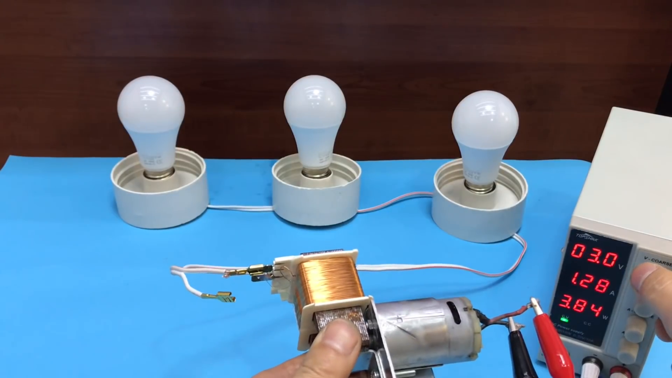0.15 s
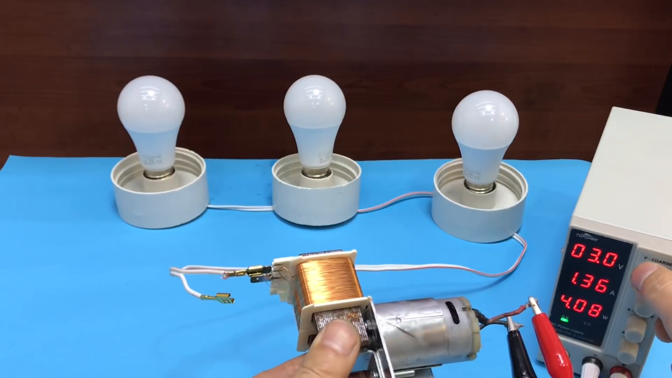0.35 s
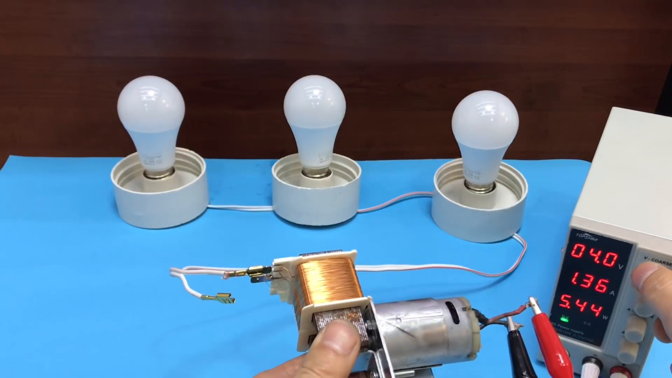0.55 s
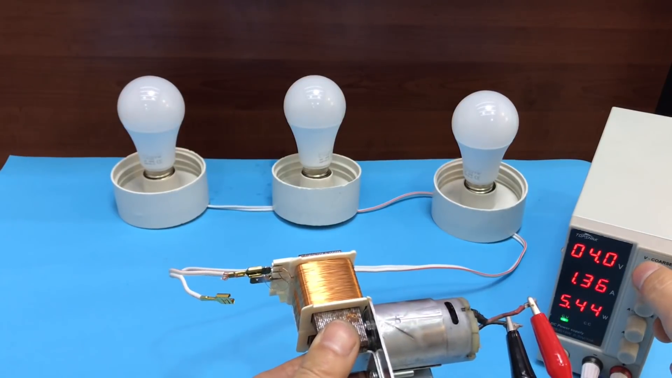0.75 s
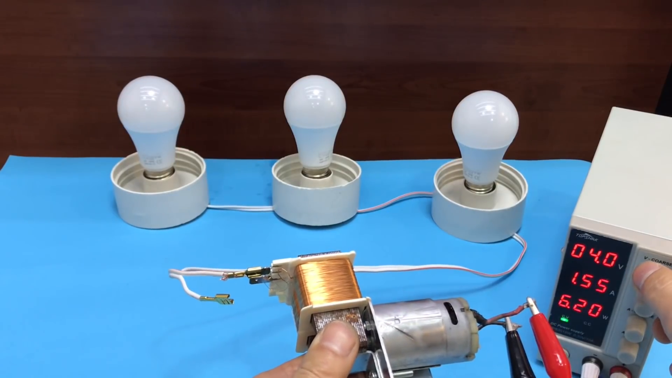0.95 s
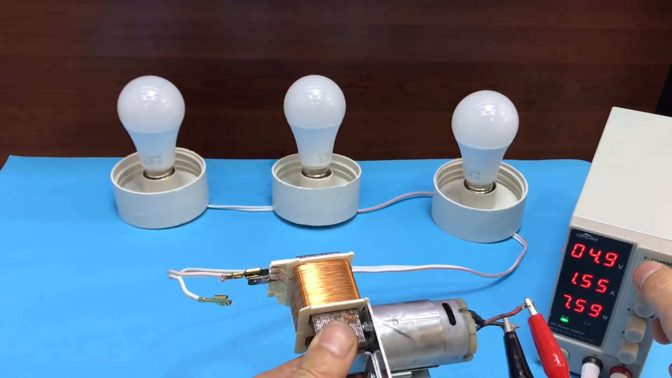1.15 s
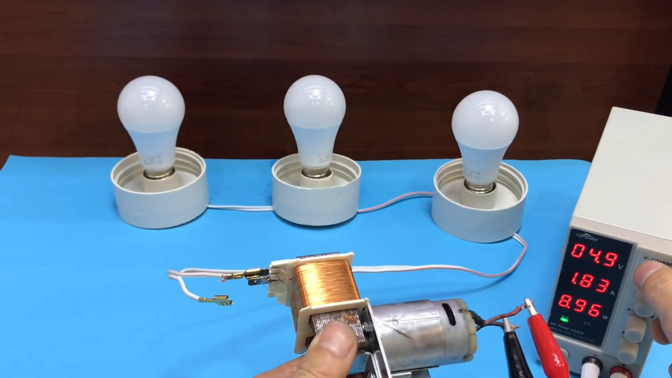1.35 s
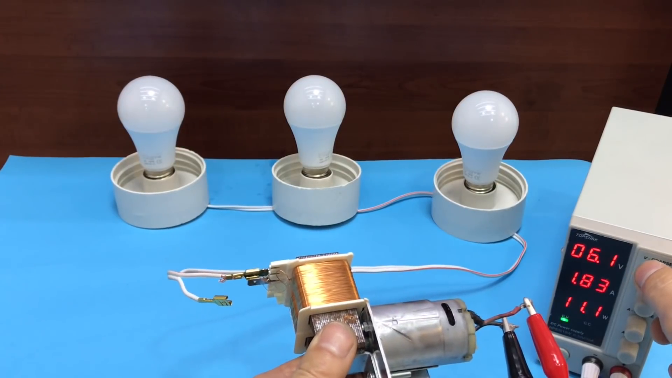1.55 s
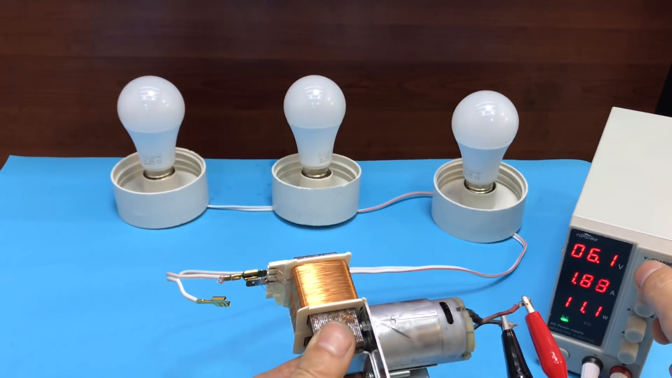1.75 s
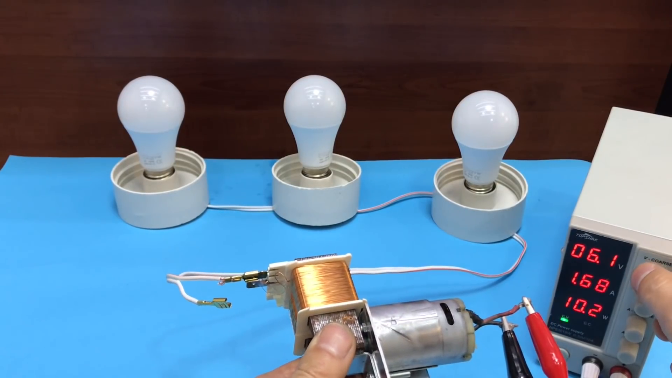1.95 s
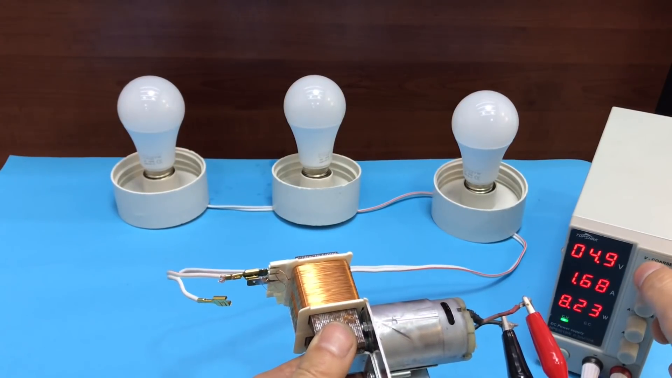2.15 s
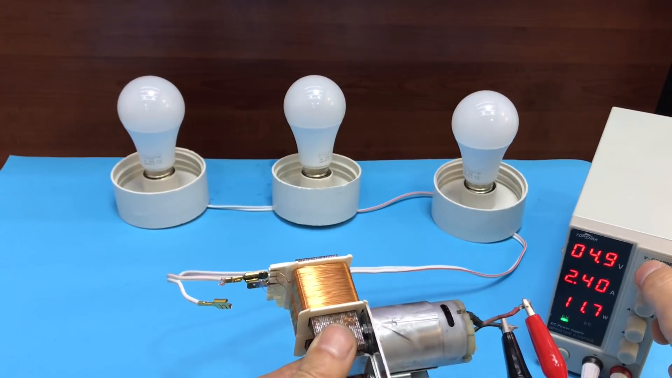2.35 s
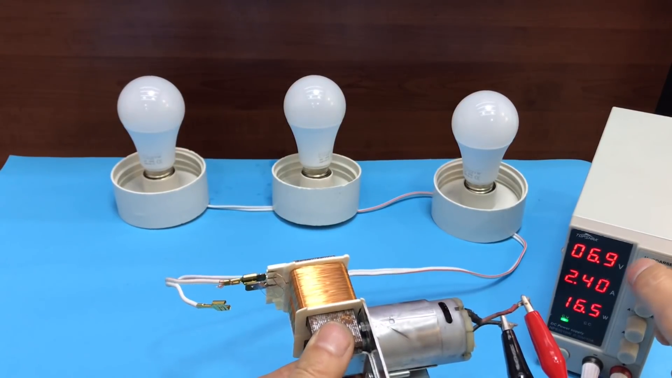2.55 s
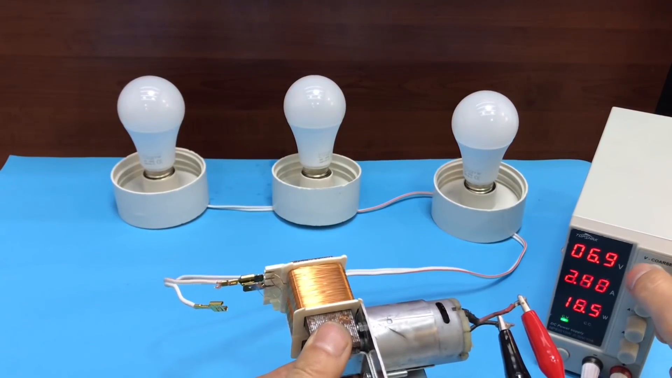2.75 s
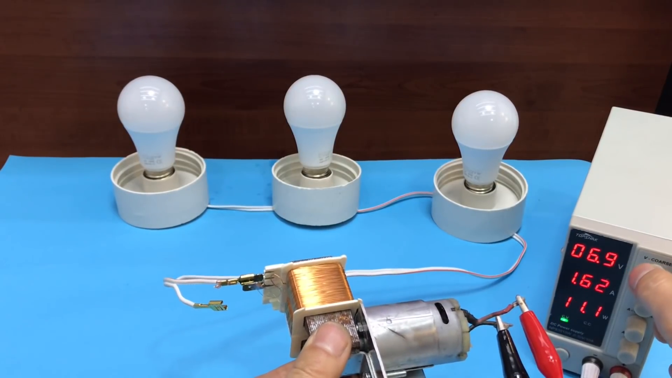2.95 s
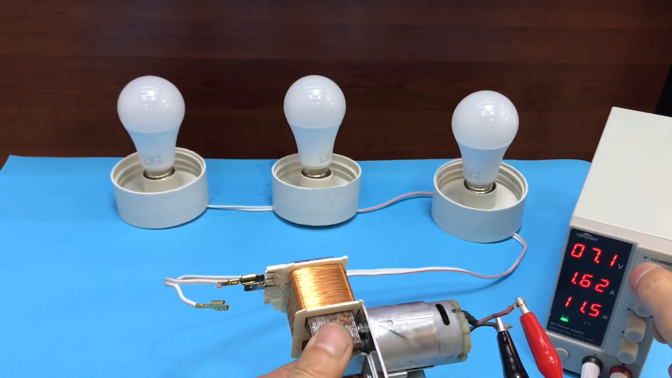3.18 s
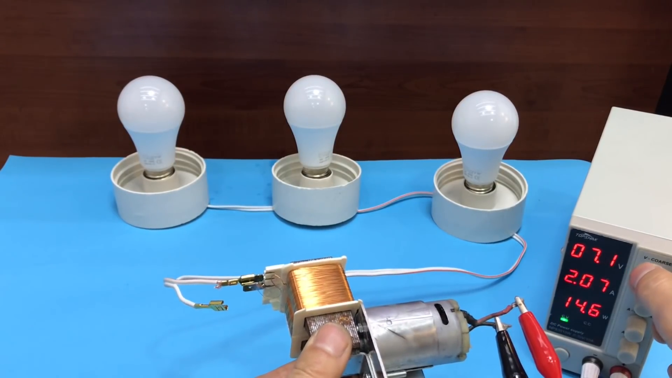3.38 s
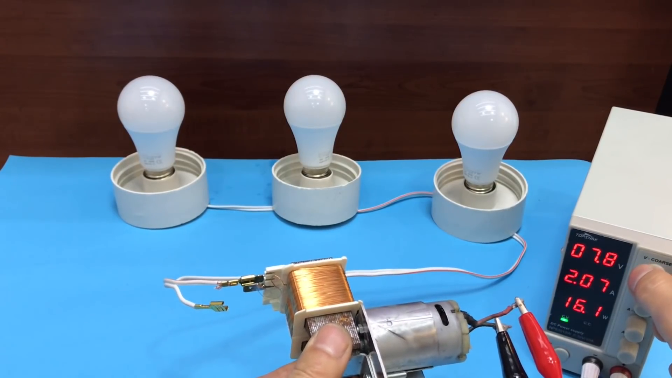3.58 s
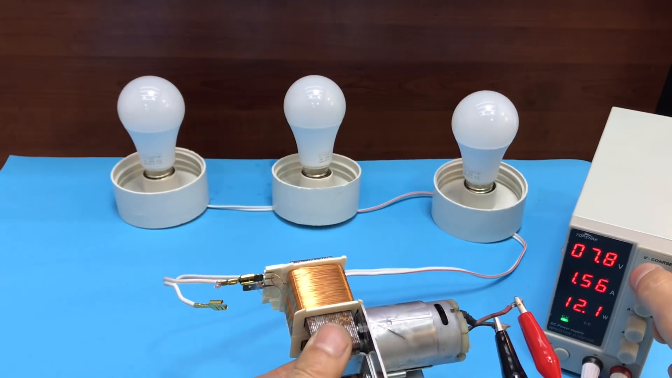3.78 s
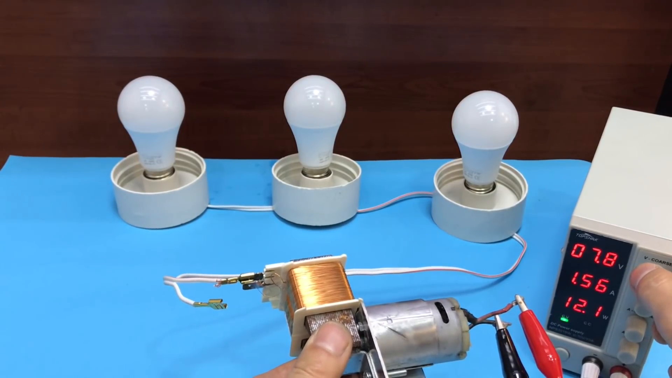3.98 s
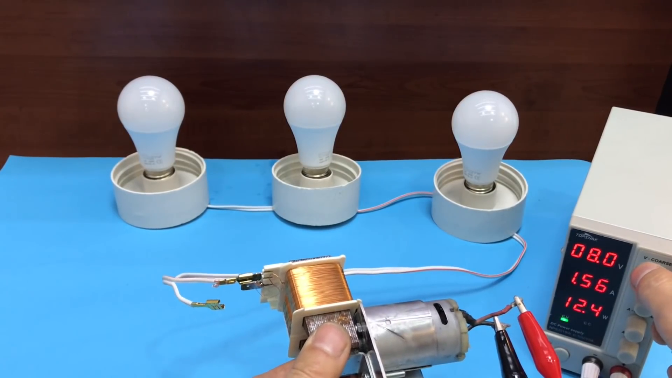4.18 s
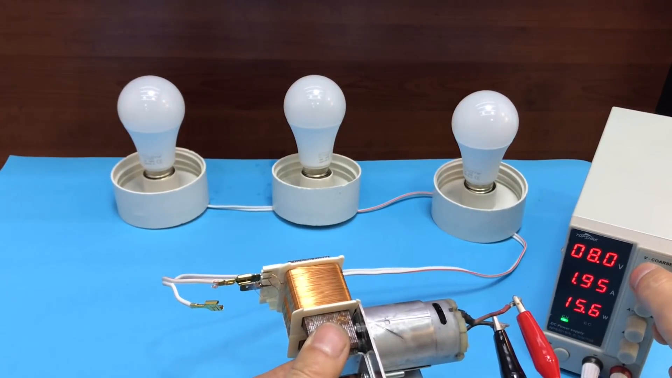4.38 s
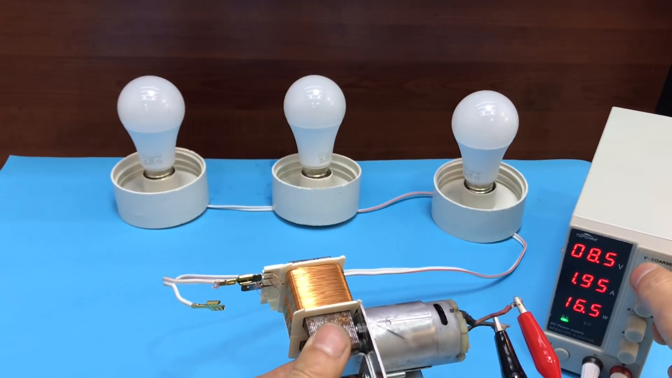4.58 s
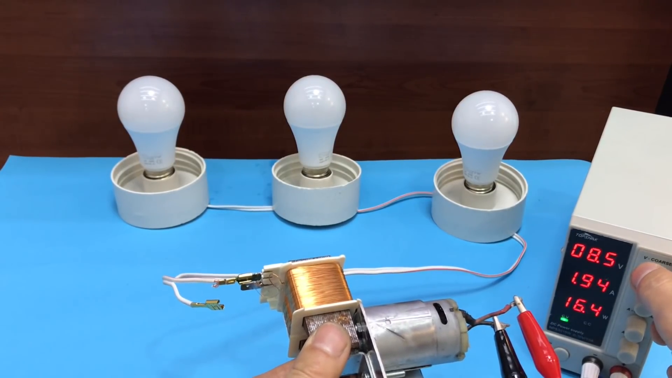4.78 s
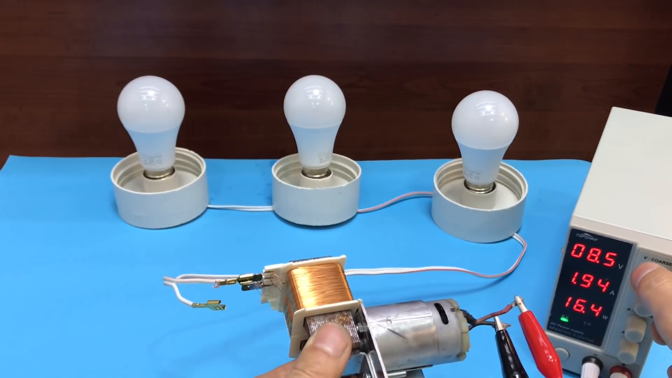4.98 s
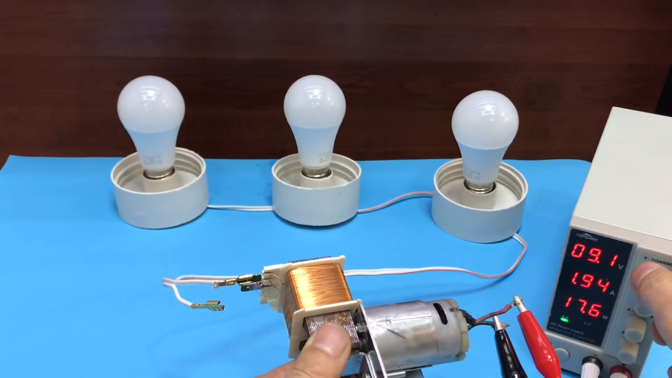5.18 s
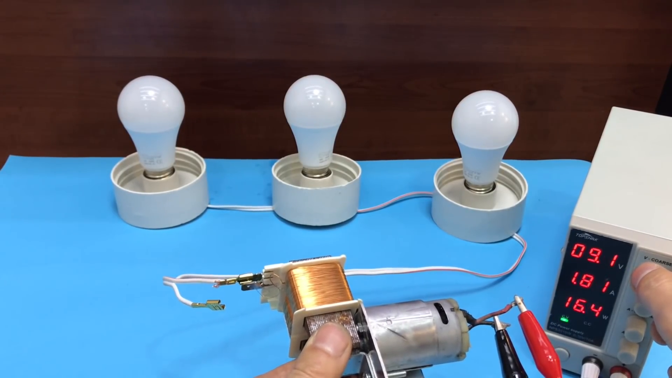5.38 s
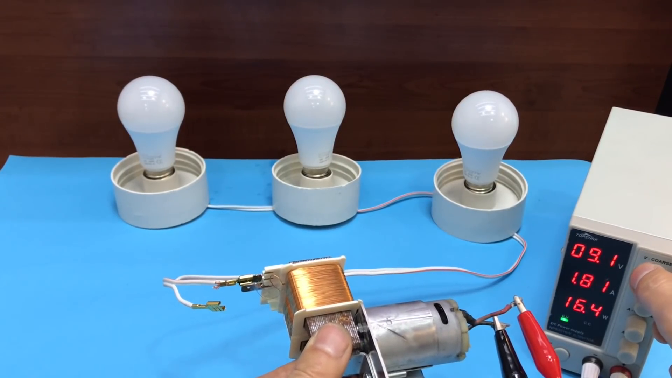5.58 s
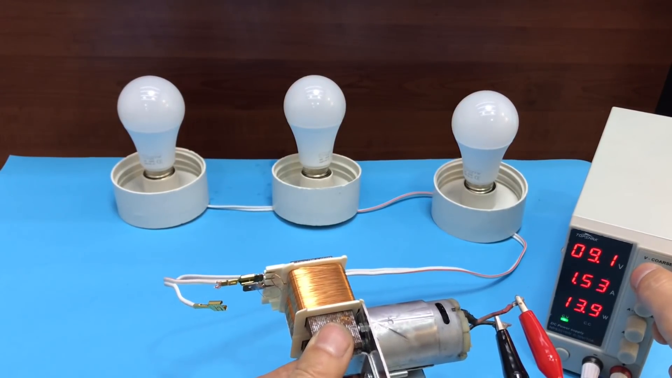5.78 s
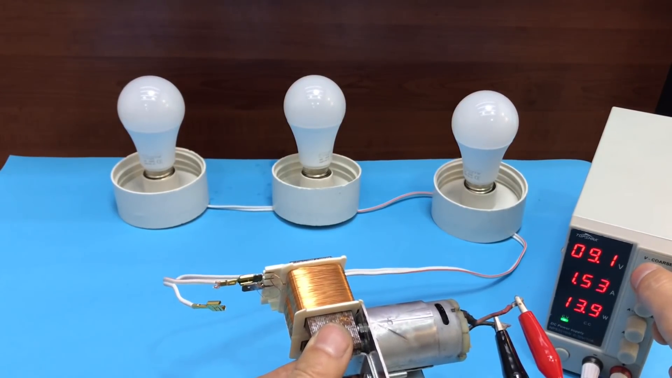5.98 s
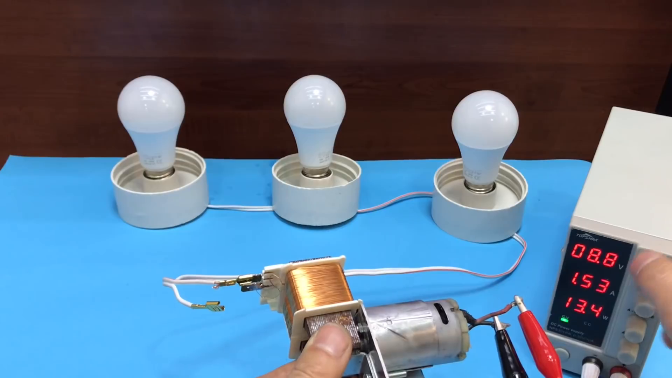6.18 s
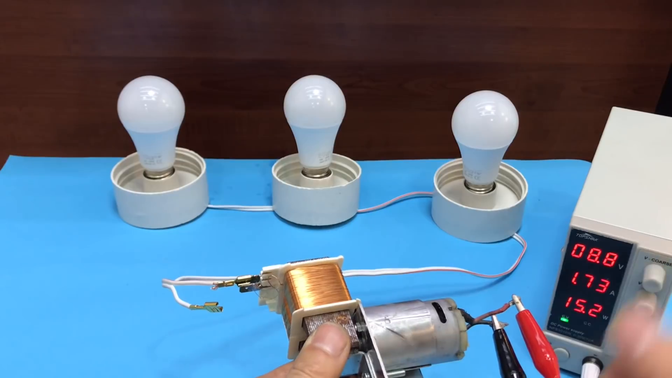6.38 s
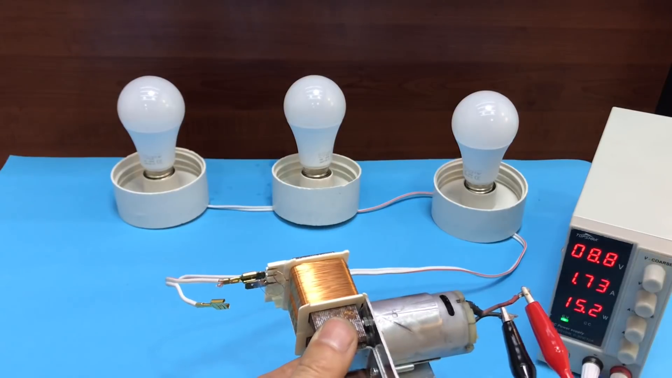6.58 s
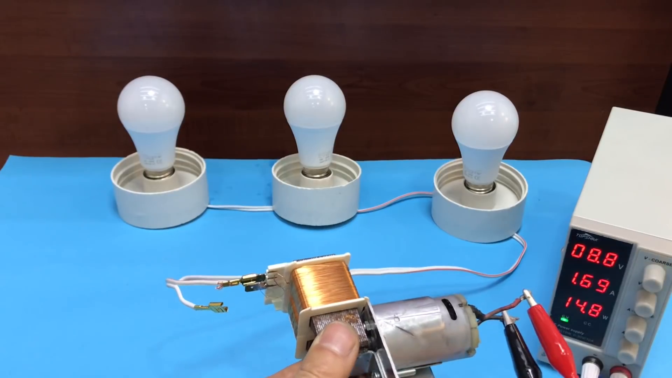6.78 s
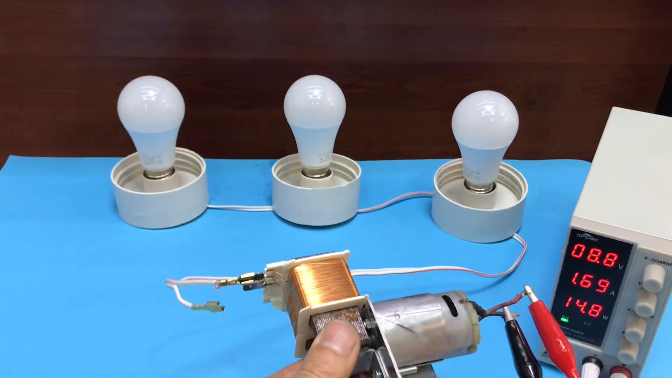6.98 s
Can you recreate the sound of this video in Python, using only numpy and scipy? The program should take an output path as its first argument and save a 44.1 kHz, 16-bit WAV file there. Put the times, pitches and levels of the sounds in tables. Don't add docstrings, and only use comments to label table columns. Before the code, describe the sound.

A small brushed electric motor spins up with a gritty rising whine, rattles and knocks, sags, then settles into a steady high whir.

```python
import sys
import numpy as np
from scipy import signal
from scipy.fft import rfft, irfft
from scipy.io import wavfile
from scipy.ndimage import uniform_filter1d

SR = 44100
rng = np.random.default_rng(int(sys.argv[2]) if len(sys.argv) > 2 else 0)


def gain_from_db(level_db):
    decades = np.asarray(level_db, float) / 20
    return 10 ** decades


def store_wav(level_fs):
    pcm = np.round(np.clip(np.atleast_2d(level_fs), -1, 1) * 32767)
    wavfile.write(sys.argv[1], SR, pcm.T.astype(np.int16))


N = 310023
FULL_HZ = 188

# pitch_hz [Hz], width_hz [Hz], level_db [dB]
CAN_MODES = [(558, 61, -8.5), (912.6, 42, -14), (1187, 190, -8.5), (1580.5, 71, -5), (2111, 134, -1),
             (2607, 99, -2.5), (3370, 190, -12), (3905, 190, 1), (5300, 90, -18), (6230, 590, -5.5),
             (7260, 77, -7), (1904, 52, -4)]
# pitch_hz [Hz], width_hz [Hz], level_db [dB]
SPRING_MODES = [(12200, 200, -12), (12700, 200, -11), (13100, 200, -8), (13700, 200, -4), (15000, 400, -1),
                (15400, 500, -1)]
# pitch_hz [Hz], level_db [dB]
SPRING_SMOOTH = [(8000, -30), (12000, -16), (14300, -17), (16000, -14)]


def evened(x):
    return x / np.sqrt(np.mean(x ** 2) + 1e-20)


def read(points, hz):
    f, value = np.transpose(points)
    return np.interp(np.log(hz + 1), np.log(f + 1), value)


def columns(table):
    s, *cols = np.transpose(table)
    return [np.interp(np.arange(N) / SR, s, c) for c in cols]


def held(x, s):
    return uniform_filter1d(x, round(s * SR), mode="nearest")


def spells(rows, ramp_s=.015):
    t = np.arange(N) / SR
    steps = sum(db * ((t >= start) & (t < end)) for start, end, db in rows)
    return held(steps, ramp_s)


def wander(hz):
    knots = rng.standard_normal(4000)
    return np.interp(np.arange(N) * 2 * hz / SR, np.arange(4000), knots) * 1.044


def ring(x, modes, wash, size=8192):
    hz = abs(np.fft.fftfreq(size, 1 / SR))
    power = gain_from_db(2 * read(wash, hz))
    for mode_hz, width_hz, db in modes:
        power = power + gain_from_db(2 * db) / (1 + (2 * (hz - mode_hz) / width_hz) ** 2) ** 2
    log_gain = np.log(power) / 2
    response = np.exp(np.conj(signal.hilbert(log_gain)))
    taps = np.fft.ifft(response).real[:size // 2]
    return signal.oaconvolve(x, taps / np.linalg.norm(taps))[:len(x)]


def resonate(x, hz, width):
    turn = np.exp(2j * np.pi * np.cumsum(hz * np.ones(len(x))) / SR)
    r = np.exp(-np.pi * width / SR)
    return evened((turn * signal.lfilter([1], [1, -2 * r, r * r], x / turn)).real)


def shaft():
    # time_s [s], speed_hz [Hz]
    knob = [(0, 66.9), (.34, 81), (.72, 103.8), (1.08, 122), (1.33, 142), (1.43, 144), (1.74, 159.3),
            (1.86, 163), (2.5, 171.3), (2.96, 173.8), (3.19, 182.9), (3.39, 199.5), (4.27, 218),
            (4.62, 217.5), (4.91, 230.3), (5.48, 233.8), (5.99, 224), (7.03, 225.5)]
    # start_s [s], lowest_s [s], end_s [s], depth_hz [Hz]
    sags = [
        (1.84, 2.11, 2.49, 45),
        (3.42, 3.73, 4.27, 23.5),
        (5.48, 5.73, 5.99, 11.5),
    ]
    t = np.arange(N) / SR
    speed = columns(knob)[0]
    for start, low, end, depth_hz in sags:
        dip = np.interp(t, [start, low, end], [0, 1, 0])
        speed = speed - depth_hz * np.sin(np.pi / 2 * dip) ** 2
    return held(speed, .06)


def octaves_slow(speed):
    return np.log2(np.minimum(speed / FULL_HZ, 1))


def contact_db():
    # start_s [s], end_s [s], level_db [dB]
    contact = [(.15, .185, 1), (.195, .22, -0.5), (.37, .42, 0), (.43, .5, -1.5), (.93, 1.0, -0.5),
               (1.58, 1.99, 0), (2.01, 2.27, -0.23), (2.05, 2.21, -.5), (3.13, 3.17, 0.5),
               (3.18, 3.3, -0.5), (3.375, 3.4, 0), (3.54, 3.57, -0.5), (3.64, 3.83, 0), (3.85, 3.95, 0.5),
               (7.02, 7.1, -1)]
    return spells(contact)


def level_db(speed, full_db, per_oct_db, contact_share, own=((0, 1, 0),)):
    return full_db + per_oct_db * octaves_slow(speed) + contact_share * contact_db() + spells(own)


def room():
    # pitch_hz [Hz], level_db [dB per Hz]
    still = [(15, -36), (27, -6), (54, -4), (86, 1), (156, -3), (179, -13), (219, -8), (261, -22),
             (500, -5.5), (650, -26), (1100, -120)]
    # pitch_hz [Hz], level_db [dB per Hz]
    moving = [(18, -48), (30, -29), (76, -3), (113, -17), (156, -13), (189, -27), (300, -23.5), (390, -51),
              (660, -120)]
    # time_s [s], level_db [dB]
    moving_db = [(0, -72), (.4, -64), (.55, -72), (1.9, -77), (2.1, -71), (2.3, -75), (2.6, -93),
                 (7.03, -113)]
    # start_s [s], end_s [s], level_db [dB]
    swells = [
        (0, 0.3, 9),
        (.3, 3.0, 4.5),
        (.85, 1.2, 6),
        (4.42, 5.36, 12),
        (5.9, 6.64, 11),
    ]
    t, hz = np.arange(N) / SR, np.fft.rfftfreq(N, 1 / SR)

    def shaped(curve):
        return evened(irfft(rfft(rng.standard_normal(N)) * gain_from_db(read(curve, hz)), N))

    rumble = gain_from_db(-76.5) * shaped(still)
    passing = gain_from_db(columns(moving_db)[0]) * shaped(moving)
    drone_hz = 53.5 + 2.47 * wander(4.7)
    drone_db = -78 + spells(swells, .12) + 3.4 * wander(5.6)
    drone = gain_from_db(drone_db) * np.sin(2 * np.pi * np.cumsum(drone_hz) / SR)
    fan = gain_from_db(-80.5) * np.sin(2 * np.pi * 144.3 * t)
    return rumble + passing + drone + fan


def partial(turns, k, wander_db):
    return gain_from_db(wander_db * wander(3)) * np.cos(2 * np.pi * (k * turns + rng.random()))


def whine(turns, speed):
    # pitch_hz [Hz], level_db [dB]
    first = [(68, -65), (86, -81), (170, -77.5), (184, -84), (198, -75), (209, -69), (219, -76.5),
             (232, -87)]
    # pitch_hz [Hz], level_db [dB]
    third = [(204, -88), (370, -80), (430, -65), (480, -64), (515, -59.5), (550, -49.5), (595, -65.5),
             (650, -72)]
    # pitch_hz [Hz], level_db [dB]
    bars = [(820, -71), (1100, -74), (1450, -73), (1590, -60), (1750, -84), (1920, -58), (2070, -48),
            (2195, -45), (2380, -52), (2650, -50.5), (2700, -51), (2800, -51.5)]
    once = gain_from_db(read(first, speed)) * np.cos(2 * np.pi * turns)
    pull = gain_from_db(read(third, 3 * speed)) * np.cos(6 * np.pi * turns)
    bars_db = read(bars, 12 * speed) + 1.2 * wander(hz=10)
    return np.sqrt(2) * (once + pull + gain_from_db(bars_db) * np.cos(24 * np.pi * turns))


def low_whine(turns, speed):
    # times_shaft_speed [count], level_db [dB]
    multiples = [(4, 7.5), (7, 2.5), (8, 7), (9, 8), (10, 3.5), (11, 3)]
    # pitch_hz [Hz], level_db [dB]
    bench = [(240, 26.5), (400, 20), (555, 12), (750, 10), (1150, 9), (1600, 12), (2500, 6), (5000, 7)]
    # pitch_hz [Hz], level_db [dB]
    can_smooth = [(300, -46), (700, -21.5), (1400, -18), (2200, -7), (2900, -13), (4500, -4), (5600, -9),
                  (7500, -15), (10000, -11.5), (16000, -15.5)]
    # start_s [s], end_s [s], level_db [dB]
    whine_spells = [
        (0, .5, 3),
        (.5, .85, 4),
        (1.0, 1.3, -3),
        (2.0, 2.25, -1.5),
        (2.5, 2.95, -3),
    ]
    db = level_db(speed, full_db=-43, per_oct_db=6.4, contact_share=1) - 22.5
    db = db + spells(whine_spells, 0.057) + 1 * octaves_slow(speed)
    tones = sum(gain_from_db(tone_db) * partial(turns, k, 2.5) for k, tone_db in multiples)
    return ring(ring(gain_from_db(db) * tones, [], bench), CAN_MODES, can_smooth)


def mounted_orders(turns, speed):
    # pitch_hz [Hz], level_db [dB]
    second = [(140, -91), (300, -85.5), (345, -84), (366, -73.5), (390, -80.5), (430, -80), (470, -85)]
    # pitch_hz [Hz], level_db [dB]
    fifth = [(350, -93), (450, -75), (540, -63), (590, -64), (630, -83), (860, -74), (1000, -70.5),
             (1120, -63.5), (1200, -68)]
    # pitch_hz [Hz], level_db [dB]
    sixth = [(400, -75), (540, -67.5), (620, -75), (690, -71), (760, -69.5), (850, -87), (1100, -61.5),
             (1250, -68), (1400, -63.5)]
    answers = (2, second), (5, fifth), (6, sixth)
    return np.sqrt(2) * sum(gain_from_db(read(answer, k * speed)) * partial(turns, k, 1.5) for k, answer in answers)


def seating():
    seats = [(0, .8, .45, .8, .5), (.2, .9, .15, .3, .25), (.52, .4, .55, .85, .92),
             (.82, .4, .55, .85, .85), (.94, .4, .2, .4, .72), (1.27, .4, .1, .2, .3),
             (2.0, .3, .1, .2, .45), (2.25, .4, .1, .2, .3), (2.45, .45, .35, .4, .62),
             (3.2, .3, .4, .17, .4), (3.8, .27, .6, .18, .24), (6.6, .2, .45, .2, .2)]
    s, *shares = np.transpose(seats)
    seat = np.searchsorted(s, np.arange(N) / SR, "right") - 1
    return [held(v[seat], .05) for v in shares]


def ticks(turns, rate, share, odd_db, spread_db, width_s):
    whole = turns.astype(int)
    size_db = spread_db * rng.standard_normal(4000)[whole]
    size_db = size_db - odd_db * (whole % 2)
    age = (turns % 1) / rate / width_s
    burst = (gain_from_db(size_db) * age * np.exp(-age)) ** 2
    return 1 - share + share * burst / uniform_filter1d(burst, 4000)


def scrape(turns, speed):
    rattle, vent, brush, steady = seating()
    odd_db = np.interp(speed, [85, FULL_HZ], [0, 6.5])
    flutter = gain_from_db(0.54 * wander(30) + 0.84 * wander(140))
    worn = sum(np.sqrt(1.5 - 1.5 * (k / 44) ** 2) * partial(turns, k, 1.8) for k in range(13, 44))
    worn *= np.sqrt(3.8 * steady * speed / SR)
    twice = ticks(2 * turns + .15, 2 * speed, rattle, odd_db, 1.5, .0006)
    once = ticks(turns + .6, speed, brush, 1.5, 1.8, .0005)
    vent_tick = ticks(turns + 0.329, speed, vent, 0, 0.91, 0.00014)
    out = frame_scrape(speed, twice, worn, flutter)
    out += can_scrape(speed, twice, worn, steady, flutter)
    out += loose_part_rattle(speed, twice, worn, steady, flutter)
    out += shell_hiss(speed, twice, flutter)
    out += vent_hiss(speed, vent_tick, flutter)
    out += brush_hiss(speed, once, flutter)
    out += cap_hiss(speed, once, flutter)
    out += shield_rattle(turns, speed, twice, steady, flutter)
    out += spring_song(once, flutter)
    return out + grip_hiss(flutter)


def rubbed(db, modes, wash, power, tone, flutter):
    push = np.sqrt(power) * rng.standard_normal(N) + tone
    return ring(push * flutter * gain_from_db(db + 0.069 * wander(26)), modes, wash)


def can_scrape_db(speed):
    # start_s [s], end_s [s], level_db [dB]
    can_spells = [
        (0.198, 0.217, 0),
        (0.23, .372, -0.5),
        (0.374, 0.382, -5),
        (2.036, 2.23, 0),
        (2.792, 3.147, 1.5),
    ]
    return level_db(speed, -43, 6.4, 1, can_spells)


def frame_scrape(speed, twice, worn, flutter):
    # pitch_hz [Hz], level_db [dB]
    frame_smooth = [(300, -58), (700, -19.5), (1400, -20.5), (1800, -29), (3000, -59)]
    # start_s [s], end_s [s], level_db [dB]
    frame_spells = [
        (.1, .5, 1.5),
        (0.54, 1.21, -8),
        (2.026, 2.23, -5),
        (2.5, 3.003, -4),
        (3.0, 3.904, -1),
        (4.097, 7.1, -1),
    ]
    db = can_scrape_db(speed) - 15.5 + spells(frame_spells, .04)
    return rubbed(db, CAN_MODES[:3], frame_smooth, .5 + .5 * twice, worn, flutter)


def can_scrape(speed, twice, worn, steady, flutter):
    # pitch_hz [Hz], level_db [dB]
    upper_smooth = [(700, -57), (1300, -22), (1700, -15.5), (2900, -11), (4500, -6), (5600, -10.5),
                    (7500, -12.5), (16000, -14.5)]
    power = (.5 + .5 * twice) * (1 - .92 * steady)
    return rubbed(can_scrape_db(speed) + 1.5, CAN_MODES[3:], upper_smooth, power, worn, flutter)


def loose_part_rattle(speed, twice, worn, steady, flutter):
    # pitch_hz [Hz], width_hz [Hz], level_db [dB]
    rattle_modes = [(1900, 250, -3), (2200, 400, -2), (2600, 400, -1), (5080, 350, -.5)]
    # pitch_hz [Hz], level_db [dB]
    rattle_smooth = [(900, -50), (1500, -102), (3000, -4), (7000, -20), (12000, -63)]
    # start_s [s], end_s [s], level_db [dB]
    rattle_spells = [(0, .105, 3), (.11, .195, 5), (.225, .372, 1), (.385, .547, 4), (.544, 1.0, -4.5),
                     (1.59, 2.0, -2), (2.01, 2.25, -2), (2.38, 3.192, 1.5), (6.55, 7.1, -1)]
    db = level_db(speed, -48, 20.6, 1, rattle_spells) + 2.5
    return rubbed(db, rattle_modes, rattle_smooth, twice * (1 - 0.54 * steady), worn, flutter)


def shell_hiss(speed, twice, flutter):
    # pitch_hz [Hz], width_hz [Hz], level_db [dB]
    shell_modes = [(8460, 340, -2.5), (9400, 70, 3.5), (10350, 130, -15)]
    # pitch_hz [Hz], level_db [dB]
    shell_smooth = [(6000, -34.5), (8000, -11), (10000, -3.5), (10500, -30), (13000, -11), (15000, -36)]
    # start_s [s], end_s [s], level_db [dB]
    shell_spells = [
        (0, 1.2, 7),
        (2.45, 3.96, 4.5),
        (6.0, 7.1, -2),
    ]
    db = level_db(speed, -40.5, 17.5, 6.2, shell_spells) - 8.0
    return rubbed(db, shell_modes, shell_smooth, 0.43 + 0.24 * twice, 0, flutter)


def vent_hiss(speed, vent_tick, flutter):
    # pitch_hz [Hz], width_hz [Hz], level_db [dB]
    vent_modes = [(11045, 120, -2.5), (11400, 330, -3), (11620, 200, -5), (12130, 300, -5)]
    # pitch_hz [Hz], level_db [dB]
    vent_smooth = [(8000, -53), (10500, -13), (11000, -4.5), (12700, -8.5), (15000, -9)]
    # start_s [s], end_s [s], level_db [dB]
    vent_spells = [(0, .5, 1.6), (.5, 1.9, -1.5), (2.3, 3.3, 0.1), (3.3, 2.5, 0.5), (4.1, 6.5, 1.35),
                   (6.5, 7.1, 0.25)]
    db = level_db(speed, -40.5, 17.5, 6.2, vent_spells) - 1.5
    return rubbed(db, vent_modes, vent_smooth, vent_tick, 0, flutter)


def brush_hiss(speed, once, flutter):
    # pitch_hz [Hz], width_hz [Hz], level_db [dB]
    brush_modes = [(13100, 140, -7), (13700, 160, -4), (14620, 140, -4.5), (15350, 330, 0),
                   (15650, 200, -4)]
    # pitch_hz [Hz], level_db [dB]
    brush_smooth = [(6000, -29.5), (11500, -26), (13000, -17), (15500, -9), (17000, -9)]
    # start_s [s], end_s [s], level_db [dB]
    brush_spells = [(0, 0.16, -2), (0.147, .94, -19), (.94, 1.17, -6), (1.17, 1.58, -0.5),
                    (2.01, 2.195, -10), (2.27, 2.38, 1), (3.2, 4.6, -2), (6.552, 7.1, -11)]
    return rubbed(level_db(speed, -45, 4.3, 2, brush_spells), brush_modes, brush_smooth, once, 0, flutter)


def cap_hiss(speed, once, flutter):
    # pitch_hz [Hz], width_hz [Hz], level_db [dB]
    cap_modes = [(6520, 640, -9.5), (7020, 200, -10), (12000, 140, -8)]
    # pitch_hz [Hz], level_db [dB]
    cap_smooth = [(3000, -68), (7000, -10.5), (16000, -49.5)]
    # start_s [s], end_s [s], level_db [dB]
    cap_spells = [(1.585, 1.987, 2), (2, 2.246, -3), (2.272, 2.418, 2), (3.18, 3.3, -2), (3.388, 3.836, -3),
                  (3.96, 7.1, -5), (6.602, 7.102, -6)]
    db = level_db(speed, -41, 8.2, 4.4, cap_spells) - 7.0
    return rubbed(db, cap_modes, cap_smooth, once, 0, flutter)


def shield_rattle(turns, speed, twice, steady, flutter):
    # pitch_hz [Hz], width_hz [Hz], level_db [dB]
    shield_modes = [(4700, 300, -5), (5080, 300, 0)]
    # pitch_hz [Hz], level_db [dB]
    shield_smooth = [(2500, -45), (5000, -18), (9000, -45)]
    # start_s [s], end_s [s], level_db [dB]
    shield_spells = [
        (0, 0.117, -4),
        (.58, 1.0, -2.5),
        (0.995, 1.5, 2),
        (3.176, 7.1, -16),
    ]
    tap = np.sqrt(steady * ticks(turns + .6, speed, 1, 0, 1, .00004))
    db = level_db(speed, -53.5, 3.8, 1.2, shield_spells)
    return rubbed(db, shield_modes, shield_smooth, twice * (1 - steady), tap, flutter)


def spring_song(once, flutter):
    # start_s [s], end_s [s], level_db [dB]
    song_spells = [
        (0, 7.1, -77),
        (.5, 1.3, 27.5),
        (.8, .94, 4),
        (1.58, 1.88, 33),
        (2.28, 3.1, 26),
        (6.5, 6.9, 29),
    ]
    return rubbed(spells(song_spells), SPRING_MODES, SPRING_SMOOTH, once, 0, flutter)


def singing(speed):
    # pitch_hz [Hz], width_hz [Hz], full_speed_db [dB], unrest_db [dB]
    rings = [
        (3894, 45, -52.5, 3),
        (8570, 80, -59.5, -0.5),
        (9440, 60, -61.5, -1),
        (15310, 70, -61, 1),
    ]
    slow_db = 8 * octaves_slow(speed) + contact_db()
    out = np.zeros(N)
    for hz, width, db, unrest_db in rings:
        out += gain_from_db(db + slow_db + unrest_db * wander(22)) * resonate(rng.standard_normal(N), hz, width)
    return out


def knock_rows(turns):
    # time_s [s], peak_db [dB]
    singles = [(.1654, -32), (.1734, -32), (.1804, -32), (.2266, -33), (.385, -28), (.396, -26),
               (.4074, -31), (.4144, -31), (.5322, -32), (1.170, -31), (1.3818, -29), (1.4097, -30),
               (1.489, -31), (1.499, -30), (1.521, -31), (1.541, -30), (1.5604, -29), (1.572, -30),
               (1.580, -31), (2.0203, -33), (2.2672, -29)]
    # time_s [s], peak_db [dB]
    hammer = [(1.5925, -24), (1.6067, -21), (1.62, -25), (1.6334, -30), (1.6728, -24.5), (1.6846, -23),
              (1.699, -21), (1.7108, -27), (1.7227, -21.5), (1.7373, -22), (1.7464, -27), (1.7734, -26.5),
              (1.7864, -20), (1.818, -25), (1.831, -21), (1.843, -29), (1.855, -26), (1.8658, -22),
              (1.8801, -20.5), (1.9123, -22.5), (1.924, -25), (1.9424, -21.5), (1.9579, -25),
              (1.9707, -21.5), (1.985, -24), (1.9972, -24), (2.281, -21.5), (2.295, -21), (2.309, -21.5),
              (2.321, -19.5), (2.3346, -25), (2.3474, -21.5), (2.359, -26), (2.373, -18.5), (2.4014, -25),
              (2.4334, -28), (2.4454, -25)]
    # first_s [s], last_s [s], peak_db [dB], turns_apart [turns]
    runs = [
        (.0705, .135, -36, 1.0),
        (.2352, .372, -32.5, .5),
        (.432, .52, -35, .5),
        (.543, .58, -34, 1.0),
        (2.468, 2.72, -30, 2.0),
        (2.7432, 2.92, -26.5, 2.0),
        (2.9274, 3.15, -25, 2.0),
    ]
    t, rows = np.arange(N) / SR, list(singles) + list(hammer)
    for first, last, db, apart in runs:
        slip, size = rng.standard_normal((2, 30))
        at_turns = np.interp(first, t, turns) + apart * (np.arange(30) + .03 * slip)
        s = np.interp(at_turns, turns, t)
        rows += [row for row in zip(s, db - 1.5 + 1.1 * size) if row[0] < last]
    return rows


def knocks(rows):
    # pitch_hz [Hz], width_hz [Hz], level_db [dB]
    knock_modes = [(1920, 260, -4.5), (2180, 260, -4), (2620, 340, 2), (3890, 230, -5), (5110, 450, .5),
                   (6660, 500, -8), (10800, 500, -12), (14600, 400, -10), (15400, 600, -3)]
    # pitch_hz [Hz], level_db [dB]
    knock_smooth = [(500, -36), (1500, -28), (7000, -14), (9500, -20), (16000, -21)]
    drive, age = np.zeros(N), np.arange(300) / SR / .0005
    chatter = rng.standard_normal((len(rows), 300)) * age * np.exp(1 - age)
    chatter[:, 40] += 8
    for (s, db), blow in zip(rows, chatter):
        at = round(s * SR)
        drive[at:at + len(blow)] += gain_from_db(db + 8.5) * blow / np.linalg.norm(blow)
    return ring(drive, knock_modes, knock_smooth, size=2048)


def spring_bursts(rows, rise_s, gain_db, modes, wash):
    drive, age = np.zeros(N), np.arange(400) / SR / rise_s
    for (s, db), grit in zip(rows, rng.standard_normal((len(rows), 400))):
        burst = grit * age * np.exp(1 - age)
        at = round((s - 1.6 * rise_s) * SR)
        drive[at:at + len(burst)] += gain_from_db(db + gain_db) * burst * np.sqrt(rise_s * SR / np.sum(burst ** 2))
    return ring(drive, modes, wash)


def spring_snaps():
    # time_s [s], peak_db [dB]
    snap_rows = [(0.497, -53.0), (0.5083, -43.0), (0.5191, -45.0), (0.5299, -35.0), (0.5406, -40.0),
                 (0.5511, -36), (0.5617, -40.0), (0.5722, -41.0), (0.5827, -48.0), (0.5929, -43.0),
                 (0.6031, -44), (0.6135, -38.0), (0.6236, -39.0), (0.6337, -38.0), (0.6437, -37.0),
                 (0.6538, -36.0), (0.6639, -37.0), (0.6738, -35.0), (0.6837, -39), (0.6934, -36.0),
                 (0.7031, -36.0), (0.7128, -39), (0.7227, -43.0), (0.7321, -40), (0.7419, -43.0),
                 (0.7516, -33.0), (0.761, -40), (0.7705, -34), (0.7799, -40.0), (0.7892, -34.0),
                 (0.7985, -41.0), (0.8079, -39), (0.8172, -37.0), (0.8268, -34.0), (0.836, -38),
                 (0.8452, -36), (0.8543, -37.0), (0.8634, -37.0), (0.8723, -39.0), (0.8816, -36.0),
                 (0.8906, -39.0), (0.8996, -32), (0.9086, -36.0), (0.9175, -35), (0.9265, -38.0),
                 (0.934, -45.0), (0.943, -48.0)]
    return spring_bursts(snap_rows, .00065, 1.5, SPRING_MODES, SPRING_SMOOTH)


def glints(turns):
    clear_tones = [(38, .98, 1.14), (39, 1.0, 1.18), (40, 1.08, 1.2), (14, 2.5, 2.95), (15, 2.5, 3.15),
                   (20, 2.45, 2.9), (24, 2.45, 2.9), (25, 2.45, 2.9), (28, 2.95, 3.17), (19, .68, .85),
                   (17, .85, 1.05)]
    clear_db = [-62, -59, -60, -57, -56, -62, -61, -61, -53, -60, -61]
    out = np.zeros(N)
    for (k, start, end), db in zip(clear_tones, clear_db):
        out += gain_from_db(db) * np.sqrt(2) * spells([(start, end, 1)], 0.038) * partial(turns, k, 3.3)
    return out


def spring_flicks():
    # time_s [s], peak_db [dB]
    flick_rows = [(1.1517, -51.0), (1.1639, -37.0), (1.1791, -43.0), (1.1947, -42.0), (1.21, -39.0),
                  (1.2233, -50.0), (1.2342, -36.0), (1.2477, -42.0), (1.2591, -40.0), (1.2738, -39.0),
                  (1.2852, -48.0), (1.2956, -40.0), (1.31, -39.0), (1.3213, -44.0), (1.3315, -35),
                  (1.3454, -40.0), (1.3617, -41.0), (1.3744, -45.0), (1.3851, -42.0), (1.4015, -37.0),
                  (1.4151, -38.0), (1.4383, -36), (1.4635, -40.0), (1.4772, -38.0), (1.4908, -39.0),
                  (1.5019, -40.0), (1.5178, -39.0), (1.5289, -44.0), (1.5449, -36.0), (1.5582, -38.0),
                  (1.5783, -37.0), (1.5981, -37.0)]
    # pitch_hz [Hz], width_hz [Hz], level_db [dB]
    flick_modes = [(15000, 350, -4), (15500, 450, -4), (13700, 250, -12)]
    # pitch_hz [Hz], level_db [dB]
    flick_smooth = [(8000, -40), (16000, -25)]
    return spring_bursts(flick_rows, .0012, -1.5, flick_modes, flick_smooth)


def sliding_rings():
    # time_s [s], pitch_hz [Hz], level_db [dB]
    slide_high = [(6.45, 15500, -75), (6.53, 15400, -49), (6.7, 15050, -47), (6.8, 14950, -56),
                  (6.87, 15000, -48), (7.03, 15200, -53)]
    # time_s [s], pitch_hz [Hz], level_db [dB]
    slide_low = [(6.3, 3450, -66), (6.5, 3350, -56), (6.7, 3250, -53), (6.85, 3340, -52), (7.03, 3250, -54)]
    out = np.zeros(N)
    for table, width_hz in ((slide_high, 400), (slide_low, 200)):
        hz, db = columns(table)
        out += gain_from_db(db) * resonate(rng.standard_normal(N), hz, width_hz)
    return out


def grip_hiss(flutter):
    # time_s [s], level_db [dB]
    grip_db = [(0, -90), (6.5, -80), (6.6, -48), (6.8, -43.5), (7.03, -42.5)]
    # pitch_hz [Hz], width_hz [Hz], level_db [dB]
    grip_modes = [(6800, 300, -1), (12150, 500, -3)]
    # pitch_hz [Hz], level_db [dB]
    grip_smooth = [(2000, -30), (8000, -22), (16000, -18)]
    return rubbed(columns(grip_db)[0], grip_modes, grip_smooth, 1, 0, flutter)


def touched(x):
    # (start_s [s], end_s [s], level_db [dB])
    touches = [
        (560, 150, [(4.05, 4.7, -7)]),
        (1590, 76, [(3.38, 3.58, 4)]),
        (2100, 560, [(1.7, 2.0, -2.5), (2.45, 3.15, -2.5)]),
        (1160, 360, [(4.0, 4.1, -9), (0.95, 1.2, -8)]),
        (2610, 200, [(.6, 1.25, -4), (1.5, 2.0, 0.5), (2.5, 3.2, -0.5), (4.7, 5.5, 2.5), (5.8, 7.1, -1.5), (6.6, 7.1, -1)]),
        (3370, 620, [(0, .6, -3), (1.0, 1.4, -2), (2.4, 3.7, 1), (4.0, 4.8, -2)]),
        (3930, 170, [(0, .4, -1), (.19, .225, -6), (.36, .385, -5), (1.2, 1.6, -1), (1.9, 2.4, -3.5), (4.8, 5.1, 2), (6.1, 6.75, 1.5), (6.76, 7.1, -3)]),
        (4440, 770, [(.5, 1.2, 3.5), (1.4, 2.0, -2), (6.5, 6.72, -0.5)]),
        (5040, 650, [(.6, 1.0, 2.5), (5.2, 6.0, -1), (6.5, 6.72, -4)]),
    ]
    out = x
    for hz, width_hz, rows in touches:
        mode = signal.lfilter(*signal.iirpeak(hz, hz / width_hz, SR), x)
        out = out + (gain_from_db(spells(rows, 0.028)) - 1) * mode
    return out


def scene():
    speed = shaft()
    turns = np.cumsum(speed * (1 + .0015 * wander(40))) / SR
    tones = whine(turns, speed) + low_whine(turns, speed) + mounted_orders(turns, speed) + glints(turns)
    can = touched(scrape(turns, speed) + singing(speed) + sliding_rings() + knocks(knock_rows(turns)))
    springs = spring_snaps() + spring_flicks()
    return (tones + can + springs + room())[None]


def roll_off(x):
    return signal.sosfilt(signal.butter(12, 17040, fs=SR, output="sos"), x)


def record(dry):
    edge = signal.firwin(511, 15760, window=("kaiser", 9), fs=SR)
    return roll_off(signal.oaconvolve(dry, edge[None], "same"))


dry = scene()
out = record(dry)
store_wav(out)
```